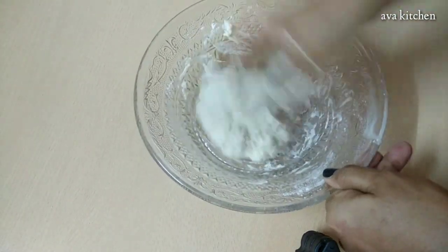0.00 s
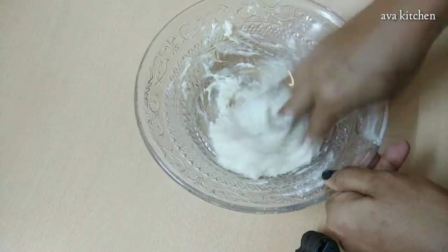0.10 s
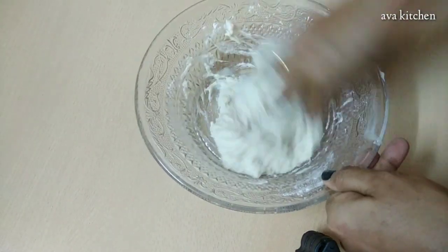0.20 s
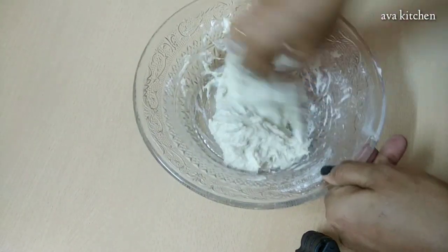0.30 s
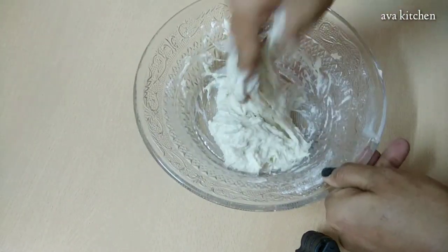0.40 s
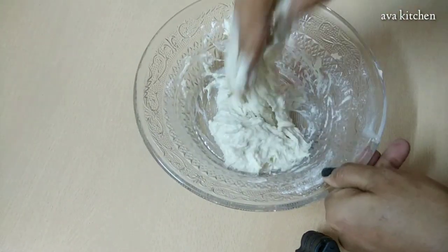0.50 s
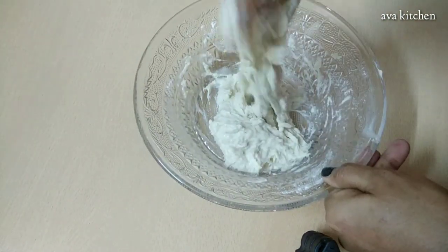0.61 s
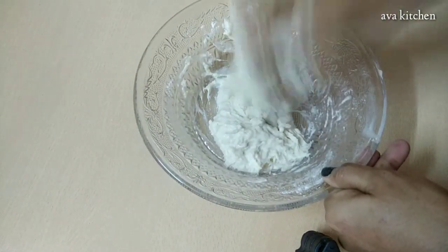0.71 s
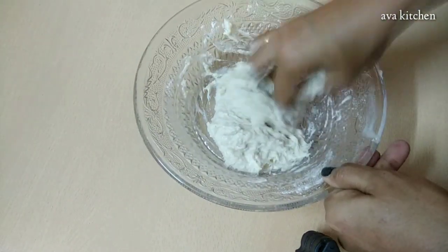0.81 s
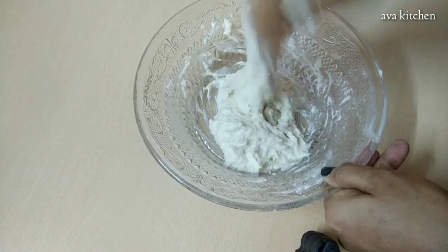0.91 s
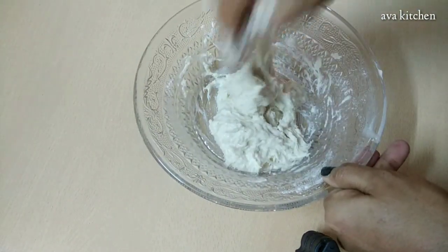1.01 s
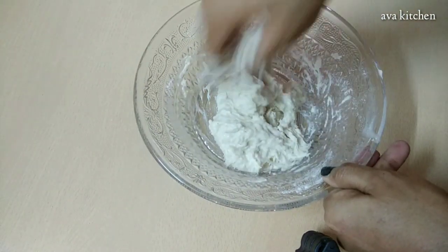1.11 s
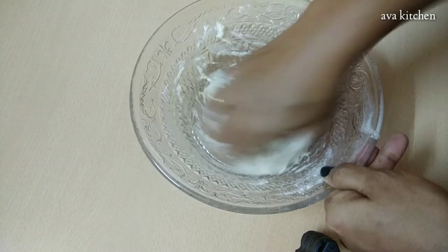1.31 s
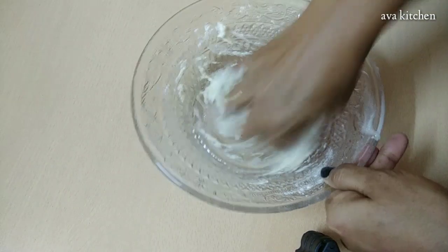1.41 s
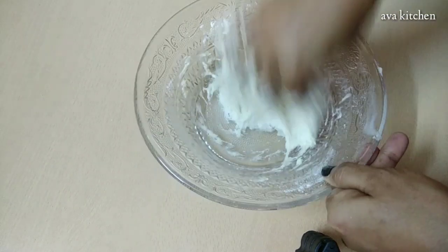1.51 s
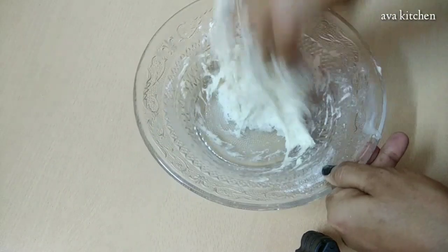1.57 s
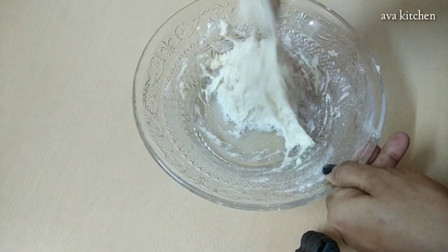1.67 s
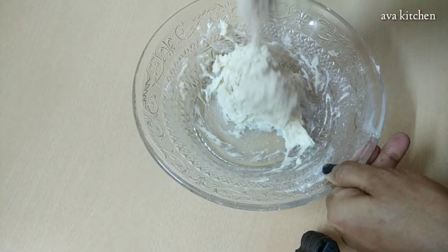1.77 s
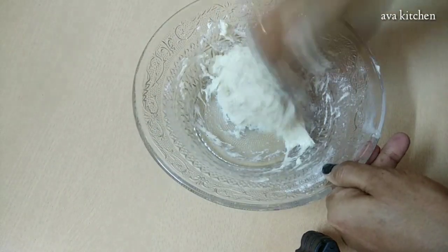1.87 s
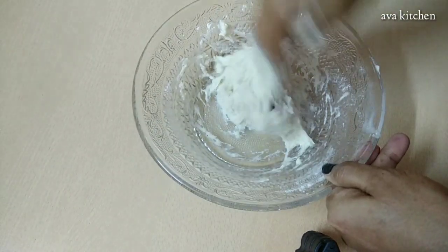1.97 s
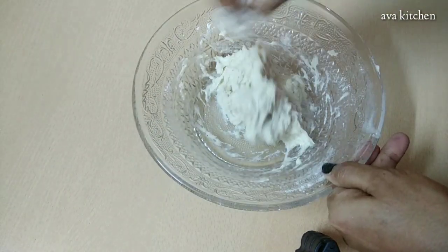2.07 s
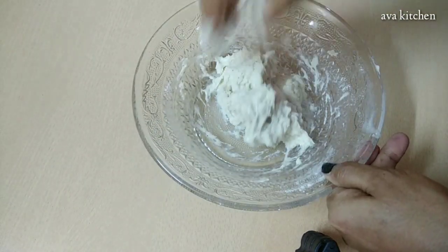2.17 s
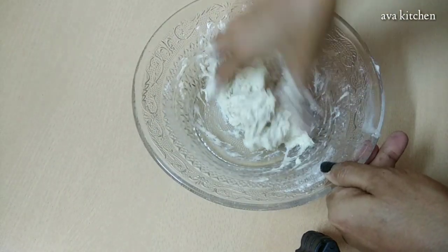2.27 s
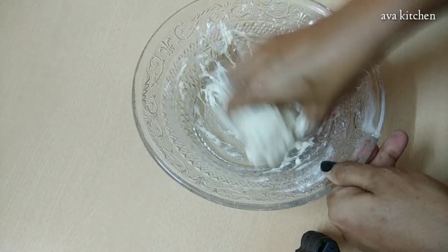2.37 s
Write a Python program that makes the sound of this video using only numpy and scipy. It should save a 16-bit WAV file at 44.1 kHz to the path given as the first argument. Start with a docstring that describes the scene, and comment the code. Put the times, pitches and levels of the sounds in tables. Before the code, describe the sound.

Wet batter squelching and crackling under a kneading hand, with a glass bowl knocking.

```python
"""Wet batter crackles as a hand kneads it in a glass bowl on a table in a small kitchen.
Sticky films tear in clusters, tiny cavities ring and a few larger air pockets burst, over the low
rumble of the hand. Hard pushes make the bowl scuff and rock: each impact is a dull knock that
excites the modes of the glass and the table top. The room's standing waves ring low after every push."""
import sys
import numpy as np
from scipy import signal
from scipy.fft import rfft, irfft
from scipy.io import wavfile
from scipy.ndimage import uniform_filter1d, minimum_filter1d

SR = 44100
rng = np.random.default_rng(int(sys.argv[2]) if len(sys.argv) > 2 else 0)


def bounce(signal):
    """Save signal as a 16-bit WAV file at the path given by the first command-line argument."""
    frames = np.transpose(np.atleast_2d(signal))
    limited = np.clip(frames, -1, 1)
    pcm = np.round(limited * 32767).astype(np.int16)
    wavfile.write(sys.argv[1], SR, pcm)


N = 105840
T = np.arange(N) / SR
FREQS = np.maximum(np.fft.rfftfreq(2 * N, 1 / SR), 1)
ANTIPHASE = np.array([[1], [-1]])

# Spectrum of the room's quiet air. Each row: frequency in Hz, gain in dB.
AIR_SPECTRUM = [(25, -24), (80, -14.5), (160, 10.5), (280, -9.5), (450, 4), (650, -15), (1400, -6.5),
                (2000, -14.5), (2400, -7), (4000, -37), (16000, -33)]
# Reverberation bands. Each row: centre in Hz, level in dB, T60 in seconds, left-right correlation.
REVERB_BANDS = [(136, -7.5, 0.95, 0.86), (304, -4, 0.54, 0.86), (620, -5.5, 0.466, 0.27),
                (1055, -4, 0.4, -0.24), (2300, -0.5, 0.5, 0), (4980, -5, 0.25, -0.33),
                (11530, -6, 0.34, 0.32)]
# Standing waves of the kitchen. Each row: frequency in Hz, gain in dB, T60 in seconds.
ROOM_MODES = [(118, 12, 0.75), (169.4, 14.5, 0.83), (245.7, 7, .38), (336, -8.5, 0.2), (406, -2.5, 0.67),
              (494, -7.5, 0.62), (533, -5, 0.58), (718, -11, .3), (800, -14, .28), (920, -11.5, 0.34),
              (1051, -7.5, 0.24)]
# Pushes of the hand and scuffs of the bowl. Each row: start, peak and end in seconds, level in dB.
PUSHES = [(-.2, .14, 0.4, -46), (.25, .33, 0.42, -37.5), (.5, .62, 0.71, -53.5), (.97, 1.16, 1.6, -45.5),
          (1.68, 1.74, 2.19, -51), (2.06, 2.13, 2.25, -52)]
SCUFFS = [(0.032, 0.088, 0.17, -41.5), (1.046, 1.072, 1.38, -49.5), (1.084, 1.135, 1.145, -40.5),
          (.555, .58, 0.6, -49.5)]
# Spectra of a push, a knock and the two crackles. Each row: frequency in Hz, gain in dB.
PUSH_SPECTRUM = [(25, -23), (60, -13.5), (92, -20.5), (118, -0.5), (140, -4), (170, 0), (240, -2.5),
                 (400, -16), (900, -23), (3000, -59.5)]
KNOCK_SPECTRUM = [(30, -53), (80, -45.5), (170, -2), (300, 4), (550, 2), (850, 4), (1250, -4.5),
                  (1700, -16.5), (2600, -25.5), (5000, -27.5), (16000, -54)]
FIZZ_SPECTRUM = [(1000, -52.5), (4000, -18), (6500, -6), (8500, -3), (11000, 4.5), (15000, 1), (17000, 4)]
SMACK_SPECTRUM = [(300, -11), (800, 10.5), (1500, 1), (2500, 2.5), (4500, 1.5), (7000, -17), (12000, -29)]
# Modes of the loaded bowl. Each row: frequency in Hz, level in dB, T60 in seconds.
BOWL_MODES = [(720, -25, 0.053), (817.6, -21.5, .06), (901, -29, 0.05), (1059, -29, 0.11),
              (1223, -31.5, 0.046), (1497, -39.5, .05), (1909, -40.5, 0.045), (2319, -42, .055)]
# Impacts of bowl on table. Each row: start in seconds, level in dB, contact cut-off in Hz,
# table boom in dB, boom pitch in Hz, rebound delay in seconds, rebound level in dB.
KNOCKS = [(.2200, 4, 1500, 3.5, 310, .003, -8), (.2295, -8, 900, 9.5, 335, .0028, -4),
          (.2446, -3, 1600, -10, 260, .0025, -4), (.2569, -9, 1050, -8, 250, .003, -7),
          (.2715, -9, 1400, -15, 300, .004, -8), (.309, -21, 800, -4, 230, .003, -6),
          (1.077, -29, 1230, -20, 300, .003, -6), (1.2241, -3, 1300, -20, 260, .0024, -2),
          (1.2496, -9.5, 1210, -15, 280, .0026, 0), (1.283, -14, 1060, -4, 290, .003, -6),
          (1.3856, -7.5, 1140, -5, 250, .0025, -2), (1.8209, -13.5, 980, -6, 225, .00295, -1),
          (1.8327, -16.5, 950, -5, 230, .0033, -1), (1.8406, -21, 950, -14, 230, .003, -16)]
# Crackle through the kneading strokes. Each row: time in seconds, fizz and smack levels in dB.
STROKES = [(0, -51, -55.5), (.05, -48.5, -47.5), (.17, -52.5, -54), (.25, -52.5, -56), (.36, -55, -58.5),
           (.55, -59, -62), (.60, -49, -66), (.75, -53, -55), (.82, -65, -103), (.95, -79.5, -71),
           (1.0, -64, -65), (1.06, -54.5, -53.5), (1.22, -51.5, -48), (1.29, -53, -48.5), (1.34, -55, -88),
           (1.45, -53.5, -85), (1.55, -62, -76), (1.675, -65.5, -79), (1.70, -49, -49.5), (1.755, -58, -72),
           (1.79, -49.5, -61), (1.88, -55.5, -59.5), (1.92, -65.5, -58), (2.05, -73, -62.5),
           (2.085, -48, -47), (2.135, -55, -62), (2.18, -50.5, -57), (2.27, -52.5, -61),
           (2.33, -57.5, -61.5), (2.4, -51, -53.5)]
# Bursting air pockets. Each row: peak in seconds, level in dB, pitch and bandwidth in Hz, decay time
# in seconds, left over right in dB, hollow body level in dB, body pitch in Hz.
POPS = [(0.011, -30, 10700, 4000, .0012, 6, -5, 7000), (.0238, -25.5, 11500, 3000, 0.00045, 7, -17, 6500),
        (0.037, -28, 13500, 4000, 0.0011, 2, -14, 5000), (0.0537, -24, 12200, 3970, .0006, 7, -18, 5000),
        (0.0645, -35, 11400, 3000, .0008, 4, -22, 5000), (.1961, -28.5, 12900, 2490, 0.0013, 8, -24, 5000),
        (.236, -30, 13500, 4000, 0.0018, -3, -22, 4970), (0.426, -31, 12100, 4000, 0.0015, 1, -17, 4700),
        (.469, -35.5, 11000, 4000, 0.0023, -1, -6, 1390), (0.577, -24.5, 11400, 3500, 0.003, -3, -13, 1394),
        (0.5907, -20, 12700, 4000, 0.00074, -3, -8, 4940), (0.5938, -28, 12000, 3000, .0006, 5, -17, 5000),
        (0.708, -34, 12500, 3000, .0014, 5, -18, 4400),
        (0.7297, -28.5, 10500, 3990, 0.00055, -3, -16, 5500),
        (.7378, -33, 11400, 4040, 0.0022, 4.5, -21.5, 5000),
        (.7509, -29, 11800, 4000, 0.00089, 0, -15, 1420), (1.018, -41, 11600, 4000, .001, 1.5, -22, 5000),
        (1.166, -30, 9350, 1200, 0.0009, -9, -14, 5000), (1.1827, -26, 9400, 2500, 0.0011, -2, -9, 4800),
        (1.1992, -22.5, 10800, 1800, .0007, -5, -12, 4800), (1.221, -24, 13500, 4000, .001, 2, -10, 7000),
        (1.2293, -22.5, 11600, 4000, 0.0019, 0, -9, 5000),
        (1.617, -41.5, 11400, 5000, 0.0024, 7, -26, 6550),
        (1.6875, -24, 13900, 4000, 0.0045, -2, -18.5, 1360),
        (1.763, -37, 12000, 5000, 0.00055, 3, -11, 5030),
        (2.0763, -16.5, 11800, 6000, 0.00092, -1.5, -20, 1500),
        (2.1488, -17, 8550, 1280, 0.0012, 4, -10, 6250), (2.18, -27.5, 12200, 3000, 0.00055, 6, -25, 5000),
        (2.3544, -25.5, 10200, 4530, 0.00095, -6, -10, 5250),
        (2.3841, -27, 11000, 5100, .0007, -4, -8.5, 4500)]
# Stereo balance of the batter. Each row: frequency in Hz, left over right in dB.
TREBLE_BALANCE = [(4000, 0.5), (8500, -1), (12000, 1.5), (15000, 6.5)]


def undb(db):
    """Decibels to amplitude ratio."""
    return 10 ** (np.asarray(db) / 20)


def unit(x):
    """Normalisation to rms 1."""
    return x / np.sqrt(np.mean(x ** 2) + 1e-20)


def pan(db):
    """A level difference between left and right places a source."""
    return undb(np.array([[db], [-db]]) / 2)


def delay(x, seconds):
    """Time delay by linear interpolation."""
    t = T[:len(x)]
    return np.interp(t - seconds, t, x, left=0)


def colour(x, spectrum):
    """Minimum-phase filter through (Hz, dB) points, made causal by folding the cepstrum."""
    hz, db = np.array(spectrum, float).T
    cepstrum = irfft(np.log(undb(np.interp(np.log(FREQS), np.log(hz), db))))
    cepstrum[1:N] *= 2
    cepstrum[N + 1:] = 0
    return irfft(rfft(x, 2 * N) * np.exp(rfft(cepstrum)))[..., :N]


def butter(x, hz, kind="low", order=2):
    """Butterworth filter, maximally flat in its passband."""
    sections = signal.butter(order, np.minimum(hz, SR / 2 - 100), kind, fs=SR, output="sos")
    return signal.sosfilt(sections, x + 1e-18)


def resonate(x, hz, width_hz):
    """Second-order resonance with gain 1 at its centre."""
    return signal.lfilter(*signal.iirpeak(hz, hz / width_hz, fs=SR), x + 1e-18)


def damped_sine(t, hz, db, t60):
    """Free vibration of one mode, falling 60 dB in t60 seconds."""
    return undb(db) * np.sin(2 * np.pi * hz * t) * np.exp(-np.log(1000) * t / t60)


def clicks(per_s, spread_db):
    """Poisson impulses, most small and a few large; rms 1."""
    occurs = rng.random(N) < per_s / SR
    size = np.minimum(rng.exponential(size=N), 6)
    return unit(occurs * undb(spread_db * size) * rng.choice([-1, 1], N))


def swells(rows):
    """Sum of amplitude envelopes, each 20 dB below its peak at its start and end."""
    envelope = 0
    for start, peak, end, db in rows:
        distance = np.maximum((peak - T) / (peak - start), (T - peak) / (end - peak))
        envelope += undb(db - 20 * distance ** 1.7)
    return envelope


def room_air(db=-60.5):
    """Ambient noise: steady, low and partly correlated between left and right."""
    noise = rng.standard_normal(N) + rng.standard_normal((2, N))
    return undb(db) * unit(colour(noise, AIR_SPECTRUM))


def reflections(t60):
    """Diffuse decay: two independent dying noises, whitened so that no pitch stands out."""
    fade = np.exp(-np.log(1000) * np.minimum(T[:SR] / t60, 2))
    noise = rng.standard_normal((2, SR)) * fade
    for _ in range(3):
        white = irfft(np.exp(1j * np.angle(rfft(noise))))
        local_rms = np.sqrt(np.abs(uniform_filter1d(white ** 2, size=1500)) + 1e-18)
        noise = white * fade / local_rms
    return noise


def kitchen(direct, low_hz=100.7, delay_s=0.006):
    """Reverberation: standing waves and a diffuse field, longest in the bass, follow the direct sound."""
    centres = np.array(REVERB_BANDS)[:, 0]
    edges = np.r_[low_hz, np.sqrt(centres[1:] * centres[:-1]), SR / 2]
    response = 0
    for (_, db, t60, correlation), low, high in zip(REVERB_BANDS, edges, edges[1:]):
        mid, side = butter(reflections(t60), [low, high], "band", order=3)
        band = np.sqrt(1 + correlation) * mid + np.sqrt(1 - correlation) * side * ANTIPHASE
        response += undb(db) * unit(band) * np.sqrt(2 * (high - low)) / SR
    late = np.array([delay(channel, delay_s) for channel in direct])
    standing = sum(undb(db) * resonate(late.mean(axis=0), hz, np.log(1000) / np.pi / t60)
                   for hz, db, t60 in ROOM_MODES)
    return direct + signal.fftconvolve(late, response, axes=1)[:, :N] + standing


def finger_rub(hz=500, width_hz=130):
    """Friction of a finger on the bowl: a faint narrow-band hum that starts abruptly and fades."""
    hum = resonate(resonate(rng.standard_normal(N), hz, width_hz), hz, width_hz)
    return swells([(1.495, 1.5, 2.5, -60.5)]) * unit(hum)


def hand_pushes():
    """Structure-borne sound: the hand's soft weight rumbles through batter, bowl and table."""
    return swells(PUSHES) * unit(colour(rng.standard_normal(N), PUSH_SPECTRUM))


def scuffs():
    """Sliding friction: the bowl catches on the table in many small, dull impulses."""
    grains = colour(clicks(per_s=900, spread_db=1.5), KNOCK_SPECTRUM)
    return swells(SCUFFS) * unit(butter(grains, hz=1087))


def chatter():
    """Forced vibration: rapid contacts drive the glass modes as the bowl settles from its hardest knock."""
    contacts = butter(np.array([clicks(per_s=900, spread_db=1.5) for _ in range(2)]), hz=2330)
    ringing = sum(undb(db) * resonate(contacts, hz, width_hz=50) for hz, db, _ in BOWL_MODES)
    return swells([(0.222, 0.3, 0.305, -31.5)]) * unit(ringing)


def knocks(blow_db=23, rattle_db=-46, rattle_decay_s=0.021, right_cutoff_ratio=1.46):
    """Impact excitation: the bowl strikes, rebounds, rings and rattles, and the table top booms."""
    out, t = np.zeros((2, N)), T[:SR // 4]
    blow = -undb(blow_db) * colour(signal.unit_impulse(N), KNOCK_SPECTRUM)[:len(t)]
    glass = sum(damped_sine(t, *mode) for mode in BOWL_MODES) * (1 - np.exp(-t / 0.00094))
    for start, db, contact_hz, boom_db, boom_hz, rebound_s, rebound_db in KNOCKS:
        table_mode = damped_sine(t, boom_hz, db=-7, t60=0.027) * (1 - np.exp(-t / 0.0015))
        boom = undb(boom_db) * butter(table_mode, 116, "high", order=1)
        rebound = undb(rebound_db) * delay(butter(blow, hz=1330, order=1), rebound_s)
        impact = blow + rebound + boom
        thud = np.array([butter(impact, contact_hz), butter(impact, contact_hz * right_cutoff_ratio)])
        buzz = unit(resonate(rng.standard_normal((2, len(t))), hz=2580, width_hz=1100))
        rattle = undb(rattle_db) * buzz * np.exp(-t / rattle_decay_s)
        i = int(start * SR)
        out[:, i:i + len(t)] += undb(db) * (thud + glass + rattle)
    return out


def bowl(echo_s=0.0057, echo_db=-14):
    """Early reflection: a nearby surface returns the bowl's sounds, duller and from the left."""
    direct = knocks() + scuffs() + chatter()
    echo = delay(butter(direct.mean(axis=0), hz=1500, order=1), echo_s)
    return direct + undb(echo_db) * pan(db=6) * echo


def cavities(count=2600, low_hz=3243, high_hz=14740, decay_s=0.006, size=1200):
    """Bubble resonance: each tiny cavity in the batter rings briefly at its own pitch; rms 1."""
    out, t = np.zeros((2, N + size)), T[:size]
    for when, pitch, strength, place in rng.random((count, 4)):
        i, hz = int(when * N), low_hz + pitch * (high_hz - low_hz)
        phase = np.array([[0], [2 * np.pi * place]])
        out[:, i:i + size] += strength ** 3 * np.sin(2 * np.pi * hz * t + phase) * np.exp(-t / decay_s)
    return unit(out[:, :N])


def crackle(cluster_per_s=170, cluster_db=2.76, cavity_db=-5):
    """Shot noise: sticky films tear in clusters among ringing cavities, a fine fizz over coarse smacks."""
    times, fizz_db, smack_db = np.array(STROKES).T
    wander = np.interp(T * cluster_per_s, np.arange(4096), rng.standard_normal(4096))
    clusters = undb(cluster_db * wander)
    bubbles = undb(cavity_db) * cavities()

    def tearing(spectrum, stroke_db, per_s):
        mid, side = clicks(per_s, spread_db=2.5), clicks(per_s, spread_db=2.5)
        grains = clusters * (mid + side * ANTIPHASE + bubbles)
        return unit(colour(grains, spectrum)) * undb(np.interp(T, times, stroke_db))

    fizz = tearing(FIZZ_SPECTRUM, fizz_db + 6, per_s=2300)
    smack = tearing(SMACK_SPECTRUM, smack_db - 4, per_s=2200)
    return fizz + smack


def pops(gain_db=-4, body_q=7.5, rise_share=0.4, size=2048):
    """Pressure release: an air pocket strains, snaps open with a bright spit and its hollow resonates."""
    out = np.zeros((2, N + size))
    for peak, db, hz, width_hz, decay_s, pan_db, body_db, body_hz in POPS:
        i = max(int(peak * SR) - size // 8, 0)
        t = T[:size] + i / SR - peak  # negative during the rise
        mid, side = rng.standard_normal((2, size))
        tear = mid + side * ANTIPHASE
        spit = unit(butter(resonate(tear, hz, width_hz), 4400, "high"))
        body = undb(body_db) * unit(resonate(tear, body_hz, body_hz / body_q))
        snap = np.exp(-np.maximum(t, -t / rise_share) / decay_s)
        out[:, i:i + size] += undb(db + gain_db) * pan(pan_db) * (spit + body) * snap
    return out[:, :N]


def batter():
    """Level difference by frequency: the top treble of crackle and pops is stronger on the left."""
    wet = crackle() + pops()
    return np.array([colour(channel, [(hz, sign * db / 2) for hz, db in TREBLE_BALANCE])
                     for channel, sign in zip(wet, (1, -1))])


def scene():
    """Superposition: bowl, hand and batter sound in the kitchen, over its quiet air."""
    air = room_air()
    handling = (bowl() + finger_rub() + hand_pushes()) * pan(db=1.36)
    return air + kitchen(handling + batter())


def record(dry, ceiling_db=-0.5, window_s=0.003, top_hz=15750):
    """Peak and band limiting: the gain dips at peaks over the ceiling, and a low-pass cuts the top."""
    size = int(window_s * SR)
    allowed_gain = np.minimum(1, undb(ceiling_db) / (np.abs(dry).max(axis=0) + 1e-9))
    gain = uniform_filter1d(minimum_filter1d(allowed_gain, size), size)
    return signal.sosfilt(signal.ellip(8, .2, 70, top_hz, fs=SR, output="sos"), dry * gain)


dry = scene()
out = record(dry)
bounce(out)
```